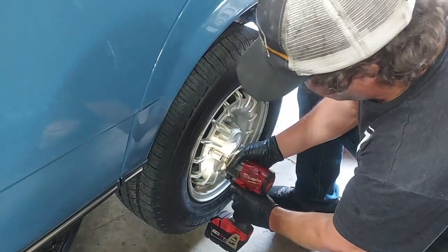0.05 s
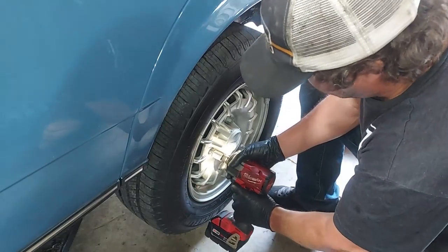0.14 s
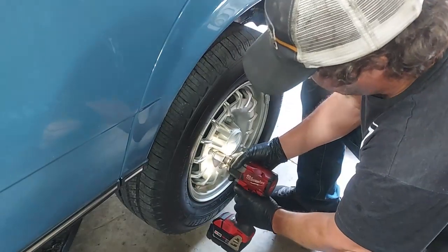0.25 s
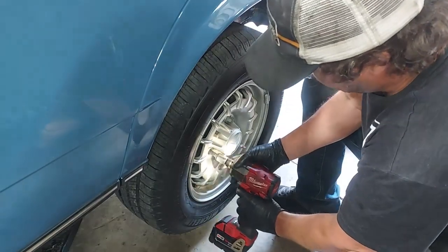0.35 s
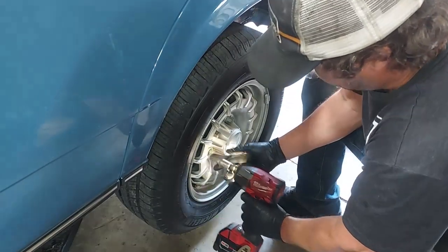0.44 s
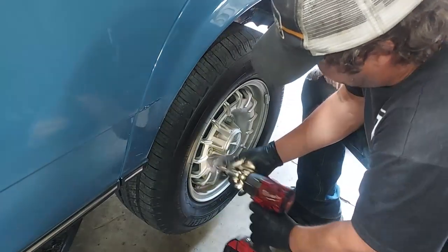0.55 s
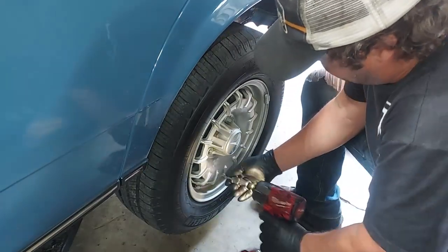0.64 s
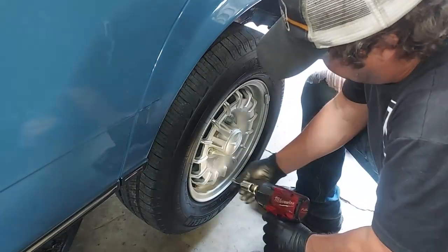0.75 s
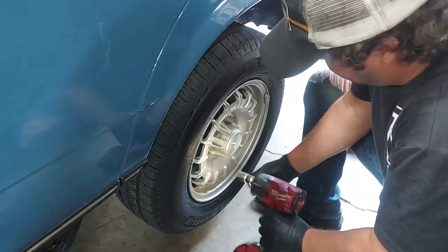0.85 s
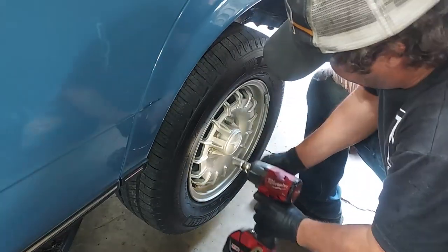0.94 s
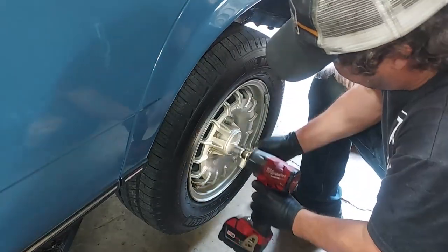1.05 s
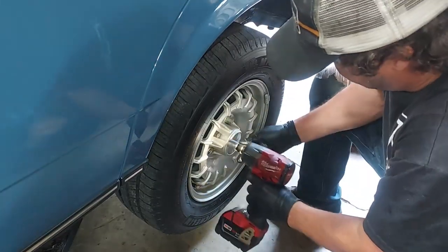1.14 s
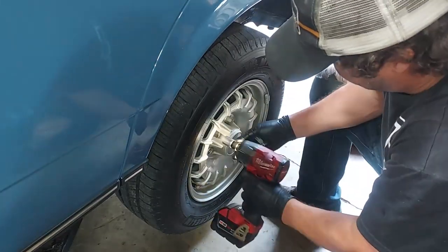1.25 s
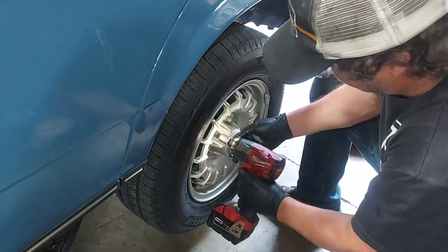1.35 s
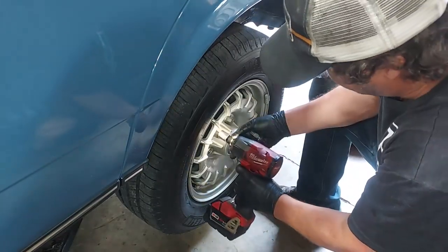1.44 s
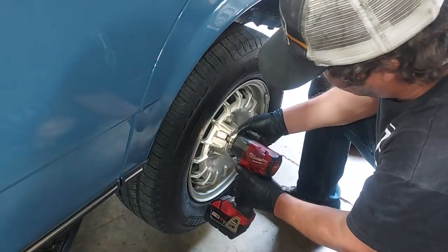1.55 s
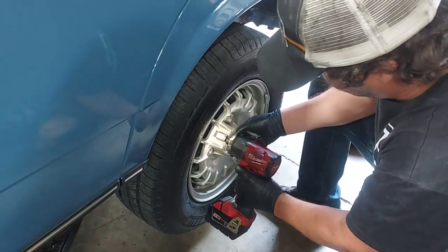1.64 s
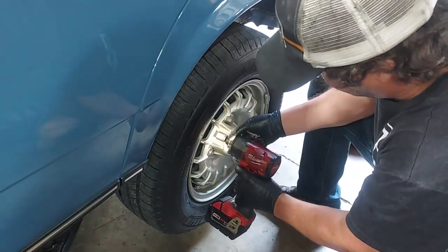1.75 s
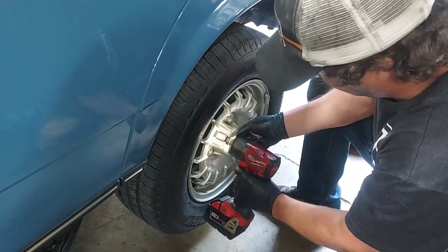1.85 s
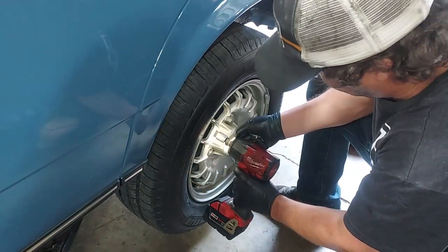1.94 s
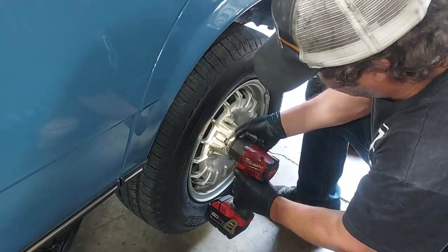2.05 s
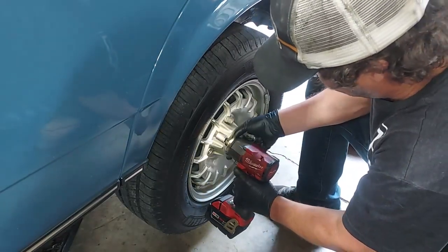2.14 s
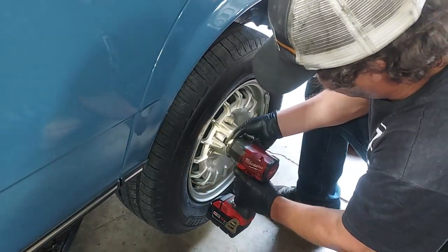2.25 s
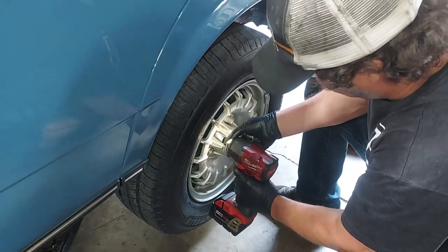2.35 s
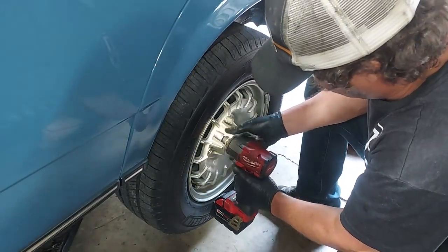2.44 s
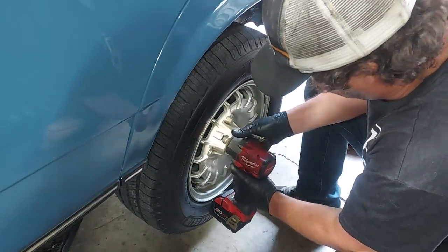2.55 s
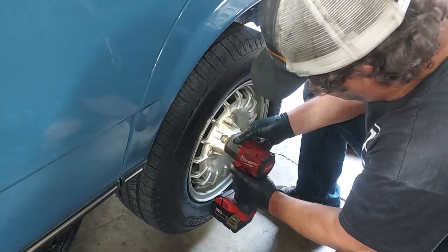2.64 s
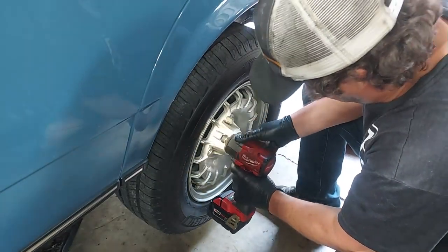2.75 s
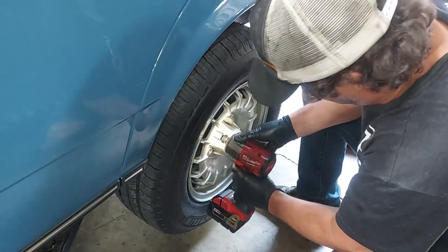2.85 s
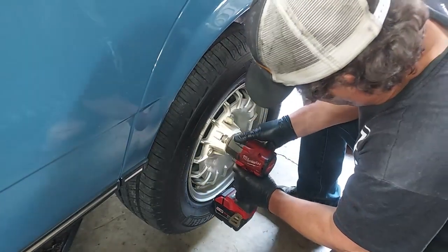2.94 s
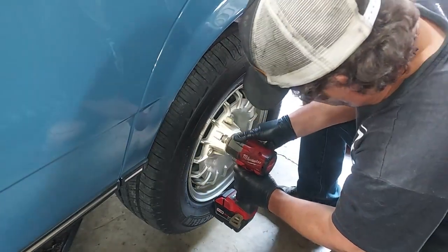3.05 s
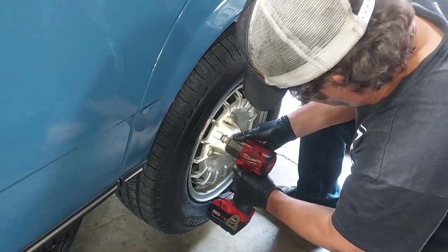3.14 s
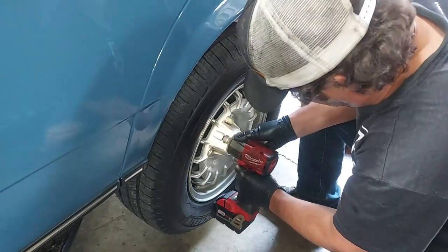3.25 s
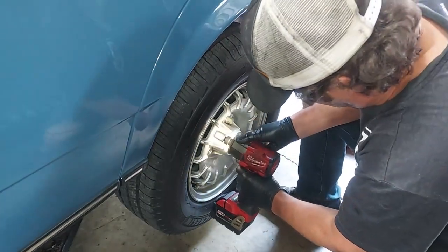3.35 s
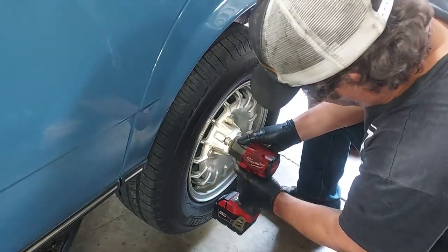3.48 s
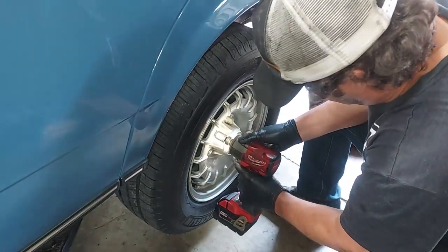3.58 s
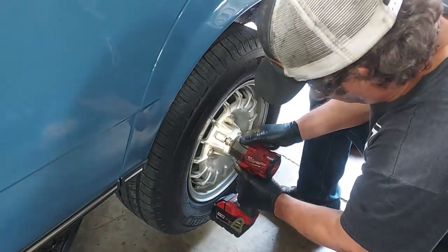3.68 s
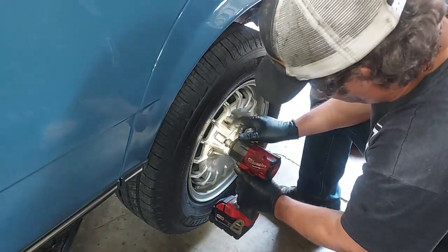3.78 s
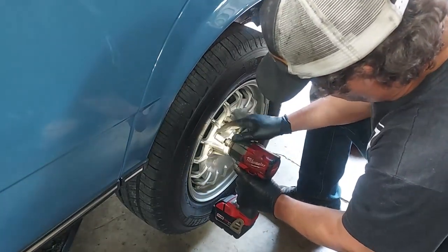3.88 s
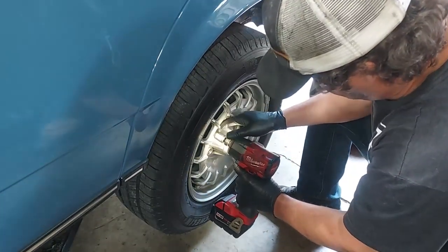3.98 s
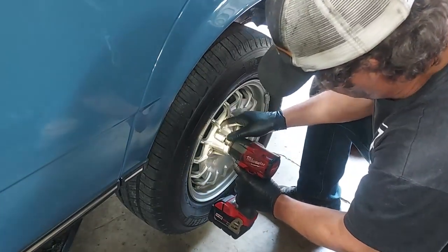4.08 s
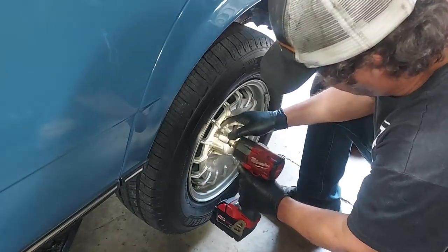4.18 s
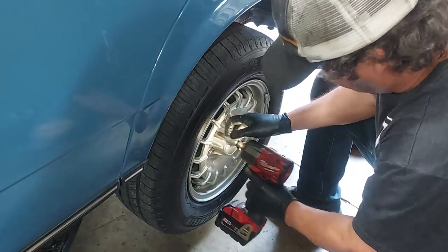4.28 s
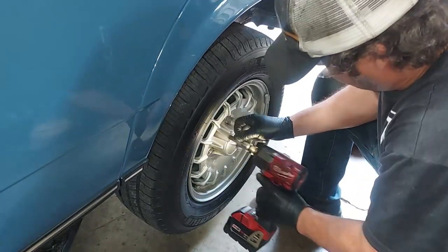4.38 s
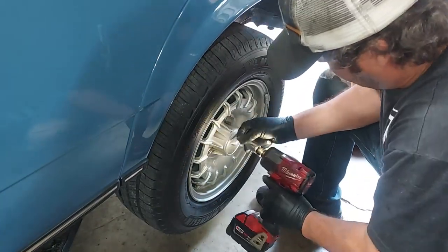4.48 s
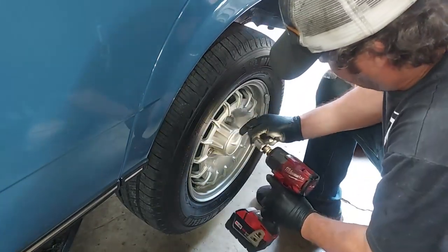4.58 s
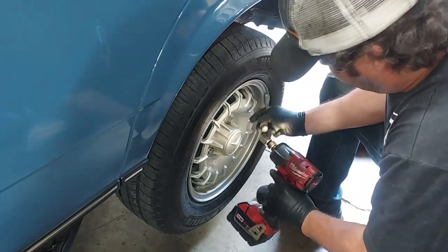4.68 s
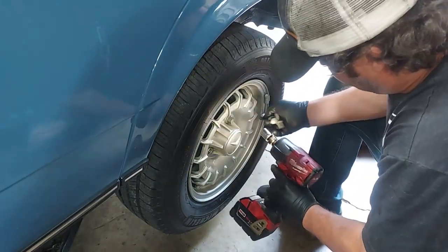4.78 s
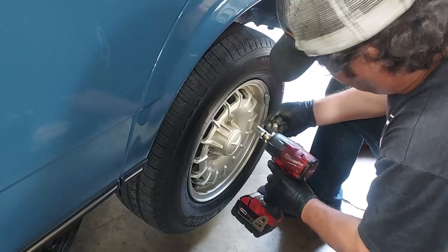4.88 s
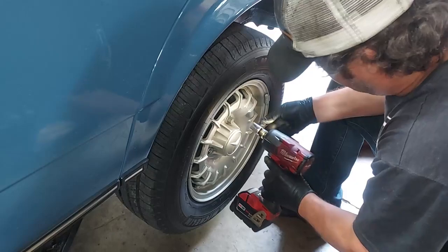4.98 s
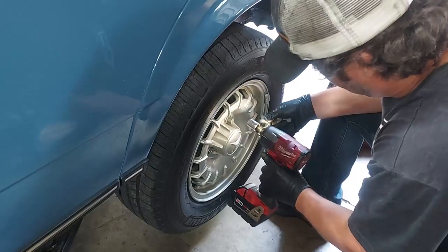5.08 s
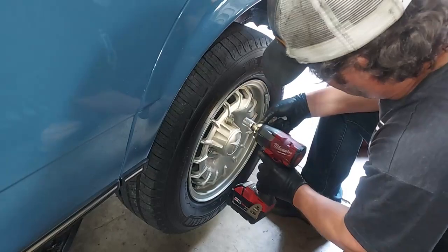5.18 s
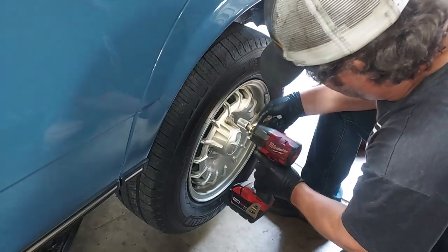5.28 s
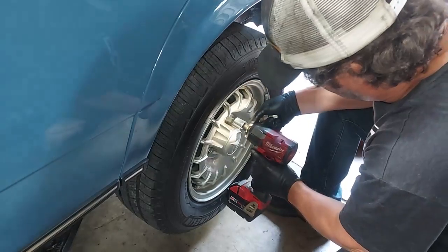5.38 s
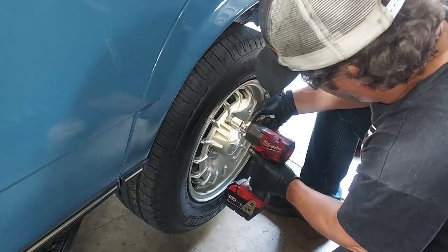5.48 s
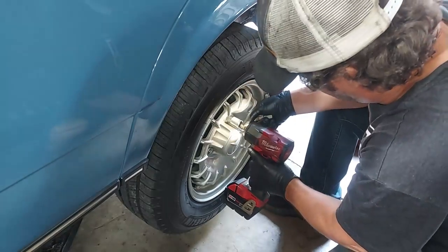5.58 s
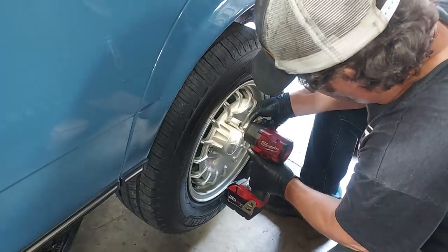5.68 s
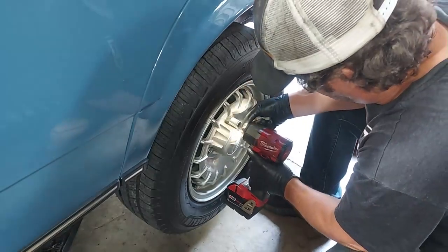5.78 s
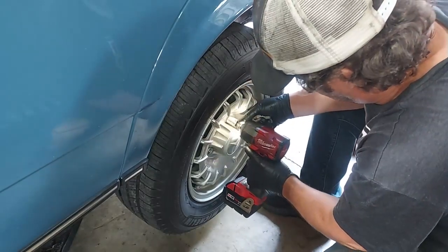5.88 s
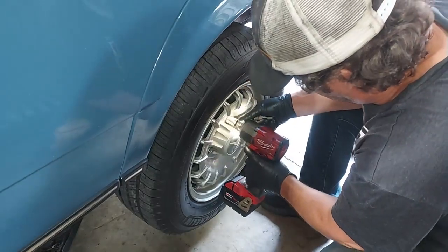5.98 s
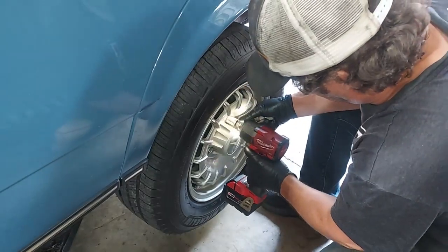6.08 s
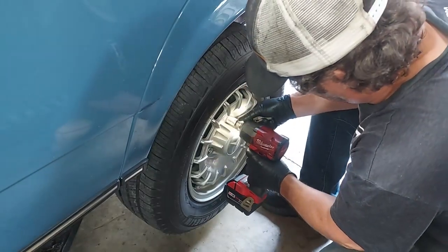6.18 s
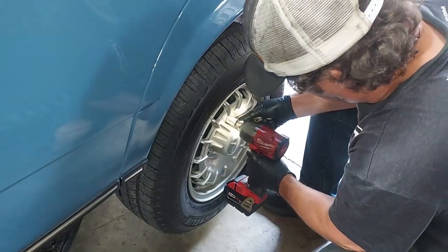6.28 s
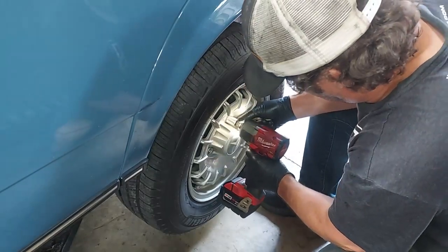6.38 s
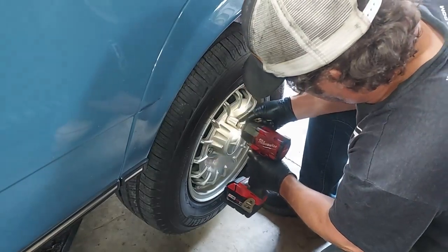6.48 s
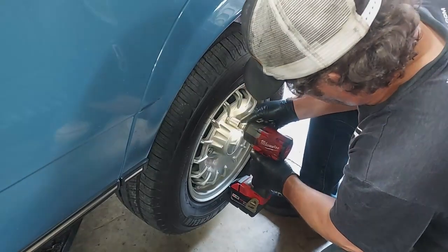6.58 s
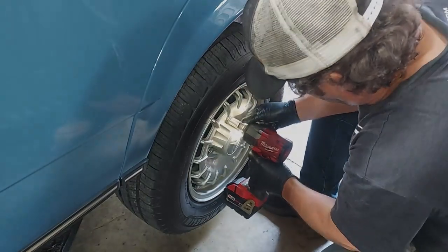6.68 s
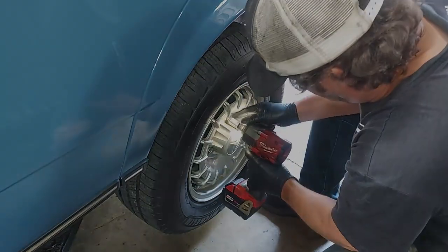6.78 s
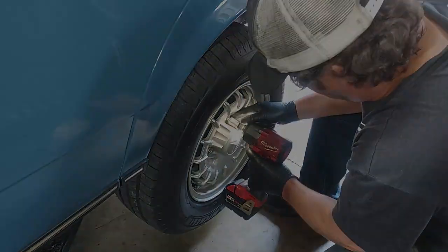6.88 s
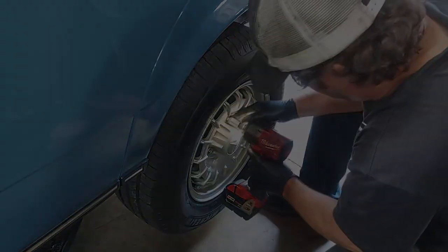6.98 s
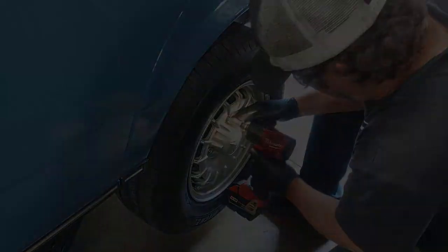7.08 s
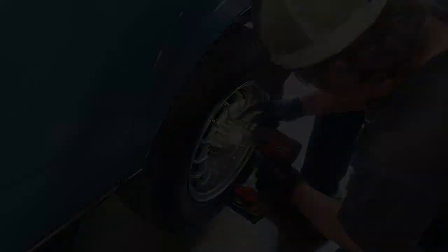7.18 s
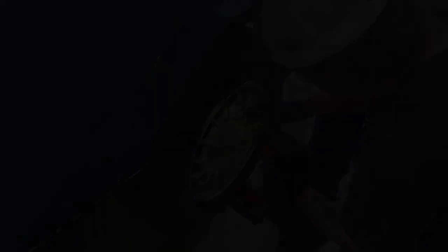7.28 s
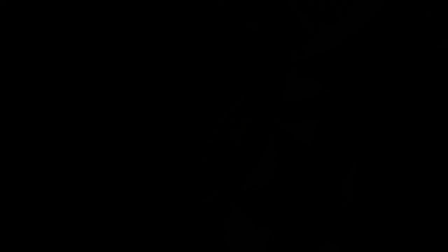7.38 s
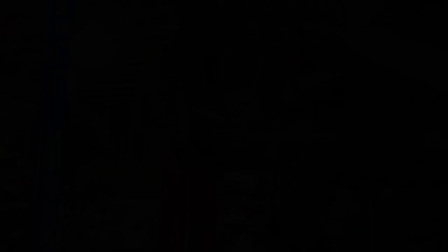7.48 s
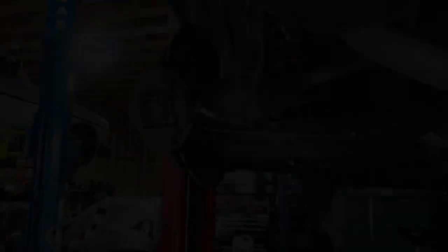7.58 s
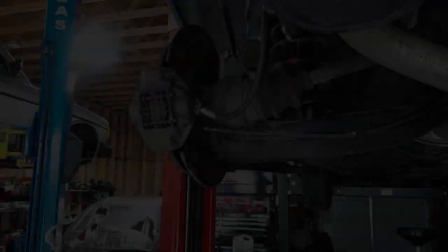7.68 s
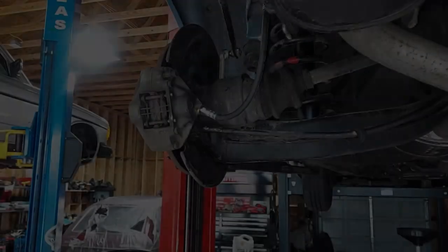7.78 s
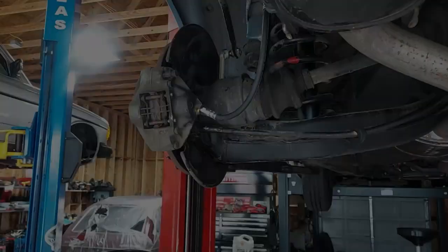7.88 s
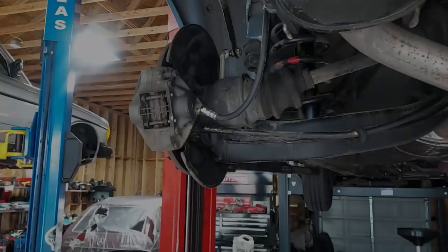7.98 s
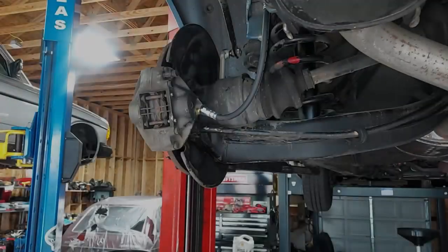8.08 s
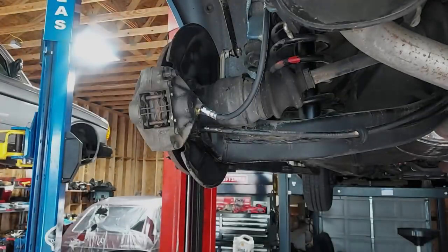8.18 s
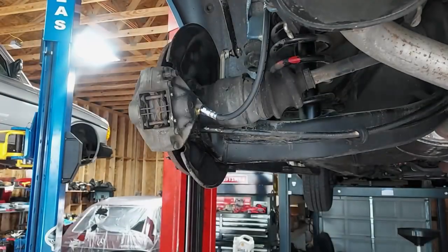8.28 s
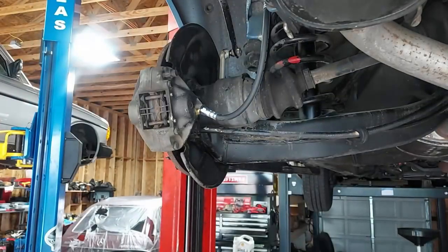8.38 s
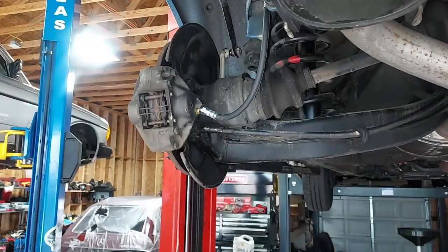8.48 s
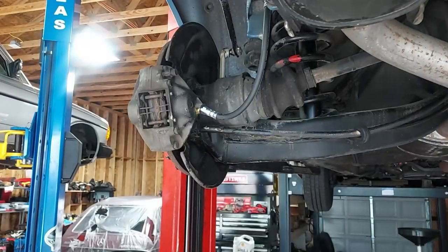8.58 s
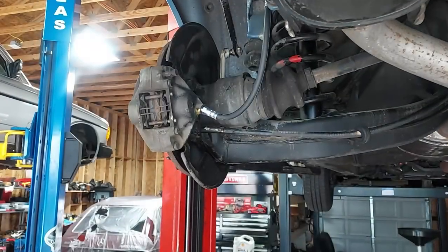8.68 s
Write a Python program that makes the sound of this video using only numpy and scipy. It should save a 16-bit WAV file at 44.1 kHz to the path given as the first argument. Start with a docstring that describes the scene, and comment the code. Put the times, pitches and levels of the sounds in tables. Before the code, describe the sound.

Three short wrench bursts, at the start, around three seconds and past six, punch loudly through quiet garage hum. Each is a rapid metallic clatter with churning gears and a high whine, ringing the wheel and thumping the tyre. Between them come small knocks, dull rubs, gritty slides and thin bolt pings. The stereo pickup is near the wheel, with a short room echo; a calm fan drone closes the scene.

```python
"""Impact wrench on wheel bolts

A cordless impact wrench undoes bolts on an alloy car wheel in a workshop: noise bursts, shaped by the
resonances of steel, wheel and tyre, make the blows. Once a bolt is free, the gears whine (sine waves) and the
socket rattles. Between bursts, parts clink and slide. Behind them a machine's hum swells and sinks (sines over
filtered noise); near the end the workshop fades out and the scene changes to a place where a steadier fan hums."""
import sys
import numpy as np
from scipy import signal
from scipy.fft import rfft, irfft, next_fast_len
from scipy.io import wavfile
from scipy.ndimage import map_coordinates

SR = 44100
rng = np.random.default_rng(int(sys.argv[2]) if len(sys.argv) > 2 else 0)


def wav_record(signal):
    """Record a signal, one row per channel, as 16-bit PCM in the file named by sys.argv[1]."""
    frames = np.transpose(np.atleast_2d(signal))
    bounded = np.clip(frames, -1, 1)
    # unit amplitude maps onto the largest positive 16-bit level
    quanta = np.round(bounded * 32767).astype(np.int16)
    wavfile.write(sys.argv[1], SR, quanta)


N = 384993

# resonances of the alloy wheel and of the steel socket: pitch_hz, width_hz, level_db
WHEEL = [(493, 45, -3), (630, 90, -8), (766, 62, -6), (1023, 130, -0.5), (1156, 160, 0), (1610, 210, -4)]
STEEL = [(1850, 340, -6.5), (2330, 290, -0.5), (2860, 470, -0.5), (3390, 200, -0.5), (3605, 220, -2),
         (4286, 670, -4), (5250, 450, -1.5), (6000, 700, -6), (6940, 560, -10.5)]
# noise colours of sharp contact, low rumble, moving air and hiss: pitch_hz, level_db (per Hz)
CRACK = [(1500, -27.5), (5000, 1), (8000, -7), (10000, -3.5), (13000, 1), (16000, -10.5)]
RUMBLE = [(20, -28), (35, -10), (55, 1), (100, -0.5), (170, -5), (260, -2.5), (380, -14), (550, -28.5),
          (1500, -58.5)]
AIR = [(150, -21), (400, -3.5), (600, 3.5), (1000, -8), (1600, -10.5), (3000, -25.5), (8000, -41)]
HISS = [(500, -10), (2000, -1.5), (5500, -0.5), (8500, -1.5), (12000, -2), (16000, -2.5)]
# one trigger pull per bolt, timed by the blow that breaks it loose: break_s, release_s (of the trigger),
# blow_db (the hardest), wind_up_db (how much softer the blow before is), last_gap_s (before the break),
# crack_db (relative to the blow), gears_db, coast_s, whine_hz, climb_hz (of the whine),
# free_db (whine once free), end_db (whine at release), off_centre (socket wobble, 0 to 1)
PULLS = [(-.4, .01, -5, 3, .03, -12, -30.5, .035, 2790, 19, -32, -33, .7),
         (3.1253, 3.48, -4.2, 1.1, .0284, -15, -30.5, .02, 2732, 35, -27, -23.5, 0.34),
         (6.369, 6.715, -4.5, 3.8, .031, -8.5, -32, .06, 2863, 260, -28.5, -36, .7)]
SPIN_UP_S = .058  # the gears start this long before the break
FREE_S = .135  # from the break until the bolt runs free


def amp(db):
    """Turn decibels into gain."""
    return 10 ** (np.asarray(db) / 20)


def unit(x):
    """Scale to an average strength (rms) of 1."""
    return x / np.sqrt(np.mean(np.abs(x) ** 2) + 1e-20)


def along(points, hz):
    """Read a curve of (pitch, value) points on a log pitch axis."""
    point_hz, values = np.transpose(points)
    return np.interp(np.log(hz + 1), np.log(point_hz + 1), values)


def since(s):
    """Seconds gone by since s, zero before."""
    return np.maximum(np.arange(N) / SR - s, 0)


def ramp(s, length):
    """Rise from 0 at s to 1 over length seconds."""
    return np.minimum(since(s) / length, 1)


def wobble(rate):
    """A smooth random curve with rate random points a second."""
    points = rng.standard_normal(int(N * rate / SR) + 4)
    return map_coordinates(points, [np.arange(N) * rate / SR])


def angle(hz):
    """Running phase of a changing pitch."""
    return 2 * np.pi * np.cumsum(hz) / SR


def noise(alike):
    """White stereo noise; alike is how far both sides match (0 to 1)."""
    share = np.clip(alike, 0, 1)
    common = rng.standard_normal(N)
    separate = rng.standard_normal((2, N))
    return np.sqrt(share) * common + np.sqrt(1 - share) * separate


def filtered(x, response):
    """Multiply the spectrum of x by a function of frequency."""
    size = 2 * next_fast_len((N + SR // 2) // 2)
    spectrum = rfft(x, size) * response(np.fft.rfftfreq(size, 1 / SR))
    return irfft(spectrum, size)[..., :N]


def coloured(x, spectrum):
    """Give x a noise colour without sounding ahead of time; white noise keeps its power."""
    def response(hz):
        # folding the cepstrum forward makes the filter minimum-phase
        cepstrum = irfft(np.log(amp(along(spectrum, hz))))
        half = len(cepstrum) // 2
        cepstrum[1:half] *= 2
        cepstrum[half + 1:] = 0
        return unit(np.exp(rfft(cepstrum)))
    return filtered(x, response)


def resonating(x, modes):
    """Let x excite a set of resonances; white noise keeps its power."""
    def response(hz):
        total = 0
        for k, (centre, width, db) in enumerate(modes):
            damping = 1j * hz * width
            resonance = damping / (centre * centre - hz * hz + damping)
            total = total + (-1) ** k * amp(db) * resonance  # neighbours have opposite signs
        return unit(total)
    return filtered(x, response)


def bursts(times, dbs, t60, ring_db, ring_t60, alike, pans=0):
    """Each contact is a hard snap, a dense burst and a weaker, longer ring; t60 = seconds to fall 60 dB."""
    t = np.arange(SR // 3) / SR
    snap = amp(-60 * t / .006) ** 2
    shape = snap + amp(-60 * t / t60) ** 2 + amp(ring_db - 60 * t / ring_t60) ** 2
    power = np.zeros((2, N + SR))
    for s, db, pan in np.broadcast(times, dbs, pans):  # pan: first side minus second side in dB
        start = max(round(s * SR), 0)
        sides_db = [[db + pan / 2], [db - pan / 2]]
        power[:, start:start + len(t)] += amp(sides_db) ** 2 * shape
    return np.sqrt(power[:, :N]) * noise(alike)


def ringing(x, db, t60):
    """Many fine modes of the metal ring on, as one decaying noise shared by all contacts in x."""
    t = np.arange(SR // 4) / SR
    modes = rng.standard_normal(len(t)) * amp(-60 * t / t60)
    return x + amp(db) * signal.fftconvolve(x, modes[None] / np.linalg.norm(modes), axes=1)[:, :N]


def swells():
    """Gain in dB of the machine's low throb and higher drone: rise, hold while the drone grows, sink."""
    # start_s, sink_s (starts sinking), throb_gain_db, drone_gain_db
    swell_rows = [(-1.5, 0, 7, 15), (1.0963, 3, 14.5, 19.5), (4.5, 6.3, 13.5, 17.5)]
    rise_s, fall_s, growth_db_per_s = .52, .8, 3.5
    throb_db, drone_db = np.zeros((2, N))
    for start, sink, throb_gain_db, drone_gain_db in swell_rows:
        shape = ramp(start, rise_s) - ramp(sink, fall_s)
        held = np.minimum(since(start + rise_s), sink - start - rise_s)
        throb_db += shape * throb_gain_db
        drone_db += shape * (drone_gain_db + growth_db_per_s * held)
    return throb_db, drone_db


def machine():
    """A machine hums at multiples of its shaft speed, over rumble, air and hiss that swell with it."""
    # shaft speed: time_s, turns_per_s
    shaft_speed = [(0, 36.8), (1, 36.68), (3, 36.65), (4.6, 36), (6.2, 35.9), (7.5, 35.4)]
    # hum at full speed and a little slower: multiple (of the shaft speed), level_db
    fast_hum = [(1, -24.5), (2, -1.5), (3, -14.5), (4, -8.5), (5, -23.5), (6, -0.5), (7, -9), (8, -21.5),
                (9, -17), (10, -16), (11, -31), (12, -29)]
    slow_hum = [(1, -26), (2, -3), (3, -15), (4, -12), (5, -19), (6, -4.5), (7, -16.5), (8, -19.5),
                (9, -12), (10, -13.5), (11, -22.5), (12, -29.5)]
    throb_db, drone_db = swells()
    times, turns = np.transpose(shaft_speed)
    speed = np.interp(np.arange(N) / SR, times, turns)
    shaft = angle(speed * (1 + 0.0033 * wobble(6)))
    slowed = np.clip((turns[2] - speed) / (turns[2] - turns[4]), 0, 1)
    low, high = np.zeros((2, N)), np.zeros((2, N))
    for order, ((_, fast_db), (_, slow_db)) in enumerate(zip(fast_hum, slow_hum), 1):
        phases = rng.uniform(0, 2 * np.pi) + np.array([[.45], [-.45]]) * (-1) ** order
        line_db = fast_db + slowed * (slow_db - fast_db) + wobble(5)
        line = amp(line_db) * np.sin(order * shaft + phases)
        if order < 4:
            low += line
        else:
            high += line
    hum = amp(-58.5 + throb_db) * unit(low) + amp(-67.5 + drone_db) * unit(high)
    rumble = amp(-65.5 + .88 * (throb_db + drone_db) / 2) * coloured(noise(0.5), RUMBLE)
    # air and hiss follow part of the drone's swell
    air = amp(-87.5 + 0.94 * drone_db + .8 * wobble(9)) * coloured(noise(.55), AIR)
    hiss = amp(-85.5 + .6 * drone_db) * coloured(noise(.15), HISS)
    return (hum + rumble) * amp([[-.8], [.8]]) + air + hiss


def fan():
    """A fan hums on a few gently wavering tones, over its own rumble and air."""
    # hum tones: pitch_hz, level_db
    tones = [(71, -3), (134, 0), (269, -18.5), (375, -24.5)]
    t = np.arange(N) / SR
    hum = np.zeros(N)
    for hz, db in tones:
        hum += amp(db + 2 * wobble(6)) * np.sin(2 * np.pi * hz * t + .5 * wobble(8))
    hum = amp(-57.5) * unit(hum)
    rumble = amp(-58) * coloured(noise(.55), RUMBLE)
    air = amp(-76.5) * coloured(noise(.55), AIR)
    return (hum + rumble) * amp([[-1.6], [1.6]]) + air


def workshop():
    """The machine's workshop fades down, the scene changes, and a fan's hum and a steady hiss fade in."""
    handover_s, fade_out_s, fade_in_s, floor_db = 7.55, .6, 0.61, -16.5
    late = ramp(handover_s, .1)
    fading = amp(floor_db * ramp(handover_s - fade_out_s, fade_out_s))
    rising = amp(floor_db * (1 - ramp(handover_s, fade_in_s)))
    hiss = amp(-77.3) * ramp(handover_s, .4) * coloured(noise(.15), HISS)
    return (1 - late) * fading * machine() + late * rising * fan() + hiss


def sliding():
    """Glove and socket stroke the metal: catching noise gives grit on steel and a dull rub in the wheel."""
    # strokes: start_s, length_s, grit_db (bright), rub_db (dull)
    slide_rows = [(0.31, .28, -79, -72), (.86, .42, -76, -85), (1.528, 0.32, -77.5, -58),
                  (1.969, .08, -68, -79.5), (2.056, .12, -63.5, -89), (2.286, .03, -52, -57.5),
                  (2.357, 0.5, -64.5, -59), (4.158, .14, -73, -75), (4.48, .15, -70.5, -84),
                  (4.955, 0.25, -62, -57), (5.98, .33, -76, -59.5), (7.15, .14, -74, -82)]
    t = np.arange(N) / SR
    s, length, grit_db, rub_db = np.transpose(slide_rows)[:, :, None]
    strokes = np.sin(np.pi * np.clip((t - s) / length, 0, 1))
    catches = unit(amp(4 * wobble(150)))
    grit = (amp(grit_db) * strokes).sum(0) * catches * noise(.4)
    rub = (amp(rub_db) * strokes).sum(0) * catches * noise(.5)
    return amp(-6) * resonating(grit, STEEL) + amp(0.5) * coloured(grit, CRACK) + coloured(rub, AIR)


def handling():
    """The socket knocks on bolt and wheel as it is seated, setting steel and wheel ringing; the trigger clicks
    the same way just before each pull's blows."""
    # knocks, and the trigger clicks at 3.0245 s and 6.2726 s: time_s, level_db, then relative to it wheel_db
    # (ring) and crack_db
    clink_rows = [(0.5571, -47.5, -21, -1.5), (1.1494, -64, -3, -20), (1.5475, -41, -13.5, -16),
                  (1.6995, -43, -20, -32), (2.3047, -23, -20, -10), (2.4389, -44, -5.5, -19),
                  (2.58, -31.5, -23, -31), (2.6514, -31.5, -15.5, -27.5), (2.8194, -52, -25, -10),
                  (3.0245, -46, -25, -15), (3.915, -44.5, -23.5, -23.5), (4.2364, -47.5, -14.5, -21),
                  (5.032, -39.5, -39, -22.5), (5.1069, -42, -16, -25), (5.6106, -48.5, -9.5, -16),
                  (5.7264, -44, -18, -33.5), (5.7574, -38, -18.5, -30.5), (5.9654, -28, -12, -8.5),
                  (6.2726, -43, -18.5, -10.5), (7.2205, -51, -15.5, -20), (8.2332, -54, -9, -19)]
    s, db, wheel_db, crack_db = np.transpose(clink_rows)
    steel = bursts(s, db - 9.5, t60=0.032, ring_db=-10.5, ring_t60=.12, alike=0.19)
    wheel = bursts(s, db + wheel_db + 1.5, t60=.03, ring_db=-2.5, ring_t60=0.096, alike=0.2)
    crack = bursts(s, db + crack_db + 8.5, t60=.018, ring_db=-11, ring_t60=.1, alike=0.11)
    metal = resonating(steel, STEEL) + resonating(wheel, WHEEL)
    return ringing(metal, db=-4.5, t60=0.31) + coloured(crack, CRACK)


def free_bolts():
    """A bolt clear of the wheel clinks thinly in the socket and pings high, as fading sine waves."""
    # clinks: time_s, level_db, ping_db
    clink_rows = [(.6145, -53, -62.5), (3.8332, -42.5, -47.5), (4.6694, -46, -61), (4.8465, -26, -32),
                  (4.8738, -35, -38), (4.9597, -32, -48), (7.2434, -47, -60), (7.3826, -45, -54),
                  (7.3994, -50, -62.5), (7.6344, -53.5, -68.5), (7.7129, -54, -68)]
    # ping tones of a bolt: pitch_hz, level_db, t60_s (time to fall 60 dB)
    bolt_modes = [(3628, -20, .13), (4355, -22, 0.13), (12940, -19, .3), (13400, -2, .2), (13300, -4, 0.17),
                  (13750, -12, .12)]
    s, db, ping_db = np.transpose(clink_rows)
    steel = bursts(s, db - 9.5, t60=.032, ring_db=-10.5, ring_t60=.12, alike=0.21)
    thin = signal.butter(2, 2100, "high", fs=SR, output="sos")
    steel = signal.sosfilt(thin, resonating(steel, STEEL))
    crack = bursts(s, db - 9.5, t60=0.02, ring_db=-11, ring_t60=.1, alike=.1)
    pings, t = np.zeros((2, N + SR)), np.arange(SR // 2) / SR
    for start, level in zip(s, ping_db):
        first = round(start * SR)
        for hz, mode_db, t60 in bolt_modes:
            strength = amp(level + mode_db + 2 * rng.standard_normal((2, 1)) - 60 * t / t60)
            tone = np.sin(2 * np.pi * hz * t + 2 * rng.random((2, 1)))
            pings[:, first:first + len(t)] += strength * tone
    return ringing(steel, db=-4.5, t60=0.25) + coloured(crack, CRACK) + pings[:, :N]


def knocks():
    """Rows (time_s, level_db): the socket knocks and knocks back each turn, with more as it runs down."""
    # rattling on the loose bolt: start_s, length_s, level_db
    rattle_rows = [(.0209, .045, -14), (3.2619, .29, -13)]
    # last knocks as the socket runs down: time_s, level_db
    run_down = [(.0737, -23), (.0912, -17.5), (3.584, -31), (6.744, -24), (6.787, -16.5), (6.8124, -19.5),
                (6.8593, -25.5)]
    turn_s, back_s, back_db = .0305, .0095, -2.5  # time of a turn; delay and level of the knock back
    rows = list(run_down)
    for start, length, db in rattle_rows:
        rows += [(s, db) for s in np.arange(start, start + length, turn_s)]
        rows += [(s + back_s, db + back_db) for s in np.arange(start, start + length - turn_s, turn_s)]
    return rows


def rattle():
    """The free socket's knocks are short and bright; they rock the wheel, and the tyre booms on."""
    # resonances of the tyre: pitch_hz, width_hz, level_db
    tyre = [(62, 14, -2.5), (112, 30, -4), (158, 25, -7), (245, 20, -8)]
    s, db = np.transpose(knocks())
    db = db + .8 * rng.standard_normal(len(s))  # no two knocks equally strong
    steel = bursts(s, db - 7.0, t60=0.016, ring_db=-16.5, ring_t60=0.11, alike=.65, pans=1.2)
    wheel = bursts(s, db - 25.5, t60=.02, ring_db=-6, ring_t60=.08, alike=.7)
    crack = bursts(s, db - 6, t60=0.01, ring_db=-19, ring_t60=.06, alike=.05, pans=1.5)
    boom = bursts(s, db - 32.5, t60=.2, ring_db=-5, ring_t60=1.1, alike=.5)
    metal = resonating(steel, STEEL) + resonating(wheel, WHEEL)
    return metal + coloured(crack, CRACK) + resonating(boom, tyre)


def whine():
    """Gear teeth whine, climbing as the bolt runs free; the off-centre socket and its knocks bend the pitch."""
    # gear tones: ratio (to the whine pitch), level_db
    whine_parts = [(.5, -22), (0.771, -16.5), (1, 1), (1.6, -18)]
    rise_db_per_s, fall_db_per_s = 700, 900  # in as the bolt frees, out as the motor brakes
    brake_hz_per_s = 5500
    t = np.arange(N) / SR
    hz, db, sway = np.zeros((3, N))
    for s, release, *_, coast, free_hz, climb_hz, free_db, end_db, off_centre in PULLS:
        free, now = s + FREE_S, t > s - SPIN_UP_S
        run, off = ramp(free, release - free), since(release)
        edges_db = rise_db_per_s * np.maximum(free - t, 0) + fall_db_per_s * since(release + coast)
        pitch = free_hz + climb_hz * run ** 3 - brake_hz_per_s * np.minimum(off, 2 * coast)
        hz[now] = pitch[now]
        db[now] = (free_db + (end_db - free_db) * run - edges_db)[now]
        sway[now] = off_centre
    # each knock briefly checks the motor, most strongly 2 ms later
    checked = np.max([np.exp(-((t - s - .002) / .005) ** 2) for s, _ in knocks()], axis=0)
    drag = sway * np.sin(angle(hz / 88))  # one socket turn per 88 whine cycles
    phase = angle(hz * (1 + .025 * drag - .05 * checked + .005 * wobble(120)))
    throb_db = 1 - 16 * checked - 4 * drag + 1.2 * np.array([wobble(60), wobble(60)])
    drift = .45 * np.array([wobble(12), wobble(12)])  # each side's phase wanders
    tones = sum(amp(level) * np.sin(ratio * phase + drift) for ratio, level in whine_parts)
    return amp(db + throb_db) * tones


def motor():
    """The gears churn as noise, loudest under load, then coast and brake; a stalled motor sings as sines."""
    # colour of the gear noise: pitch_hz, level_db (per Hz)
    gear_noise = [(25, -6.5), (60, 7), (115, 13.5), (250, -1.5), (500, -4), (800, -3), (1100, 0.5),
                  (2200, 1.5), (3500, 0), (5200, 0.5), (7000, -2.5), (8200, -14), (11500, -5),
                  (16000, -13.5)]
    # tones of the stalled motor: multiple (of its switching rate), level_db
    stall_orders = [(1, 2.5), (2, -22), (3, -20.5), (4, -20.5), (6, -27.5)]
    spin_up_db, load_db, brake_db_per_s = -6, 9, 230
    level = np.zeros(N)
    for s, release, _, _, _, _, db, coast, *_ in PULLS:
        loading_db = spin_up_db + (load_db - spin_up_db) * ramp(s - SPIN_UP_S, .04)
        loading_db -= load_db * ramp(s, FREE_S)
        braking_db = brake_db_per_s * since(release + coast)
        level += ramp(s - SPIN_UP_S, .005) * amp(db + loading_db - braking_db)
    gears = level * unit(amp(2 * wobble(400))) * coloured(noise(.45), gear_noise)
    # a half-pulled trigger: the motor sings at its switching rate
    stall_s, stall_length_s, stall_hz = 6.185, .13, 2470
    switching = angle(np.full(N, stall_hz))
    stalled = ramp(stall_s, .005) - ramp(stall_s + stall_length_s, .005)
    tones = sum(amp(db) * np.sin(k * switching) for k, db in stall_orders)
    return gears + amp(-57.5) * stalled * np.sqrt(2) * tones


def blows():
    """Rows (time_s, level_db, wheel_db, crack_db): blows build on the tight bolt, then hurry and fade."""
    first_blow_s = .0555  # the first of three blows on the tight bolt comes this long before the break
    tight_wheel_db, wheel_step_db = -9, 6.5  # wheel ring at the break, and less for each blow before
    rebound_s, rebound_db, rebound_wheel_db, rebound_crack_db = .0083, -7.5, -8.5, -10
    slip_s, loose_gap_s, loose_count = .034, .0197, 5  # the bolt slips, then five faster blows
    loose_db, loose_step_db, loose_wheel_db, loose_crack_db = -4.3, .5, -14.5, -7.5
    rows = []
    for s, _, db, wind_up_db, last_gap_s, crack_db, *_ in PULLS:
        for k, before in enumerate([0, last_gap_s, first_blow_s]):
            at, level = s - before, db - wind_up_db * k ** 2
            rows.append((at, level, tight_wheel_db - k * wheel_step_db, crack_db))
            if k < 2:  # the hammer bounces off the tight bolt
                rows.append((at + rebound_s, level + rebound_db, rebound_wheel_db, rebound_crack_db))
        for k in range(loose_count):
            at, level = s + slip_s + k * loose_gap_s, db + loose_db - loose_step_db * k ** 2
            rows.append((at, level, loose_wheel_db, loose_crack_db))
    return [row for row in rows if row[0] > 0]


def hammer():
    """Rapid blows drive through the steel socket into the wheel and thump the tyre."""
    # colour of the tyre's thump: pitch_hz, level_db (per Hz)
    thump_colour = [(20, -28.5), (45, -5), (110, -3), (230, -0.5), (350, -12), (700, -11.5), (2000, -49.5)]
    s, db, wheel_db, crack_db = np.transpose(blows())
    pan = .4 + 2.0 * rng.standard_normal(len(s))
    steel = bursts(s, db - 10, t60=0.023, ring_db=-15, ring_t60=.1, alike=.9, pans=pan)
    wheel = bursts(s, db + wheel_db + 1.5, t60=0.022, ring_db=-15, ring_t60=0.081, alike=.7, pans=pan)
    crack = bursts(s, db + crack_db + 3.5, t60=0.035, ring_db=-11, ring_t60=.08, alike=.05, pans=pan + 3)
    thump = bursts(s, db - 15.5, t60=0.074, ring_db=-9.5, ring_t60=0.23, alike=.4, pans=pan - 2.5)
    metal = resonating(steel, STEEL) + resonating(wheel, WHEEL)
    return ringing(metal, db=-6, t60=.13) + coloured(crack, CRACK) + coloured(thump, thump_colour)


def reverberation(x):
    """The workshop answers with a noise tail in which each frequency dies at its own speed."""
    # decay of the room: pitch_hz, t60_s (time to fall 60 dB)
    room_decay = [(80, 1.2), (300, .8), (1000, .6), (2450, .52), (2850, .6), (3300, .52), (6000, .48),
                  (9000, 0.36), (16000, 0.37)]
    hz, t, z = signal.stft(rng.standard_normal((2, SR)), SR, nperseg=256)
    decay = amp(-60 * t / along(room_decay, hz)[:, None])
    tail = signal.istft(z * decay, SR, nperseg=256)[1]
    tail *= 1 - np.exp(-np.arange(tail.shape[1]) / SR / .008)  # soft start
    return signal.fftconvolve(x, tail / np.linalg.norm(tail[0]), axes=1)[:, :N]


def scene():
    """The tool and the wheel close by, their reverberation, and the workshop behind."""
    background = workshop()
    small = handling() + free_bolts() + sliding()
    singing = whine()
    wrench = hammer() + rattle() + motor()
    room = reverberation(amp(-14.5) * wrench + amp(-19) * singing + amp(-12.5) * small)
    return wrench + singing + small + room + background


def record(dry):
    """Round off the tallest peaks and keep nothing above the band limit."""
    top_hz = 16080
    rounded = dry / (1 + np.abs(dry) ** 6) ** (1 / 6)
    return filtered(rounded, lambda hz: hz < top_hz)


dry = scene()
out = record(dry)
wav_record(out)
```